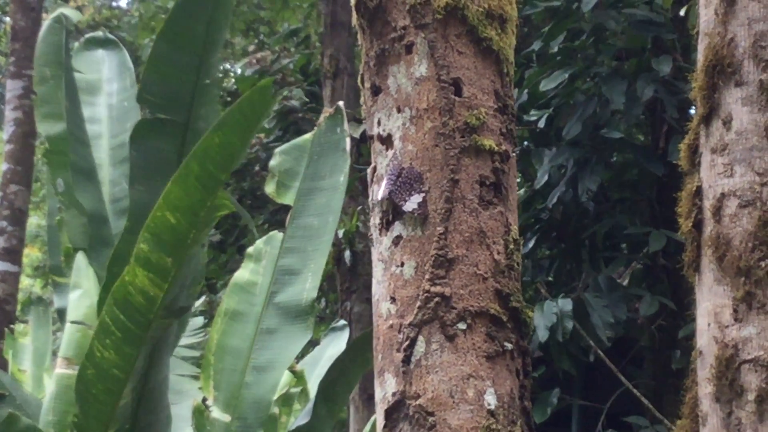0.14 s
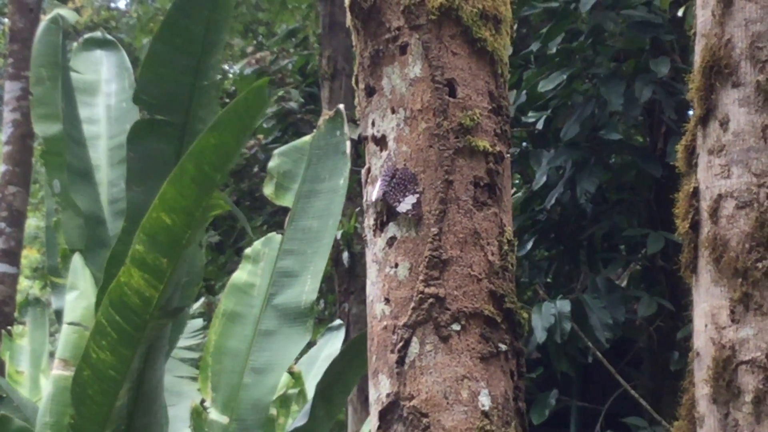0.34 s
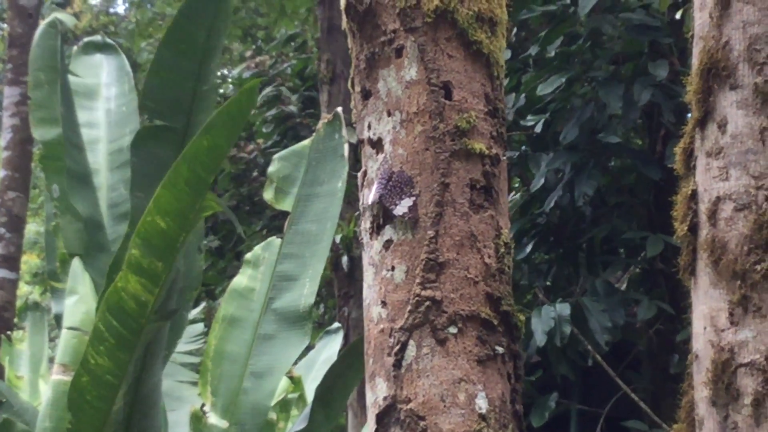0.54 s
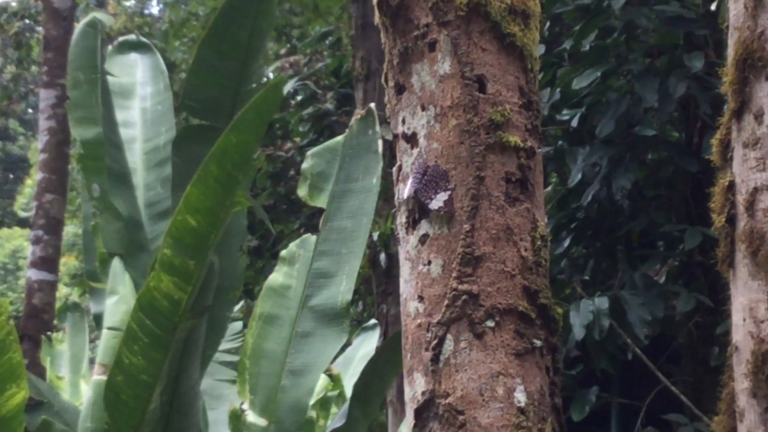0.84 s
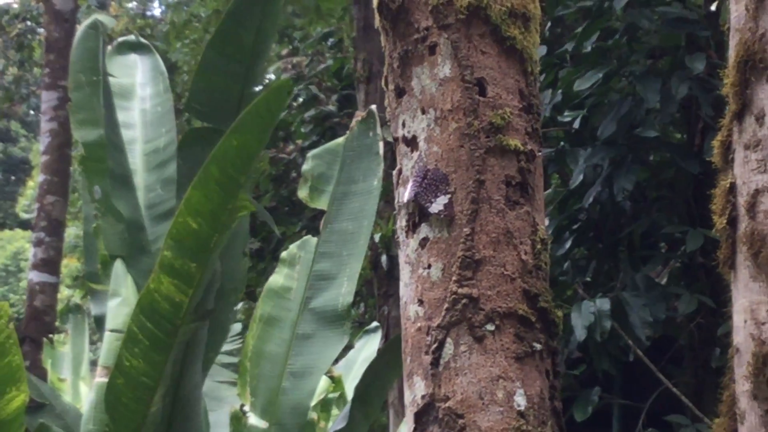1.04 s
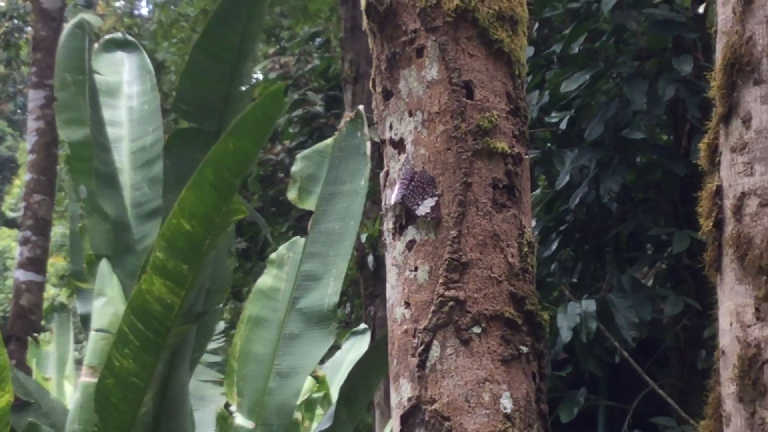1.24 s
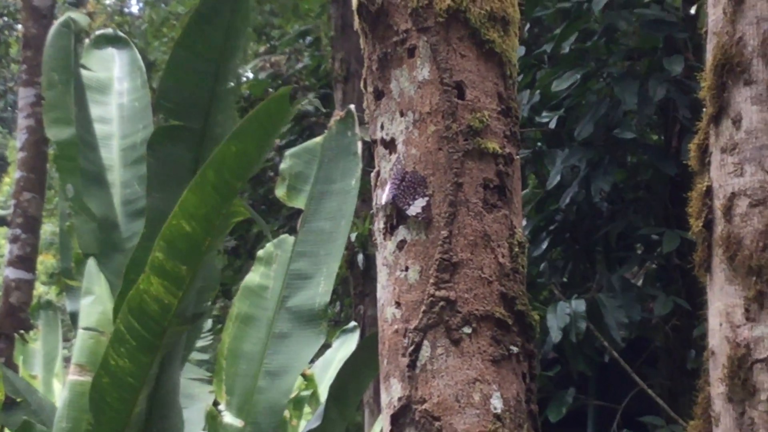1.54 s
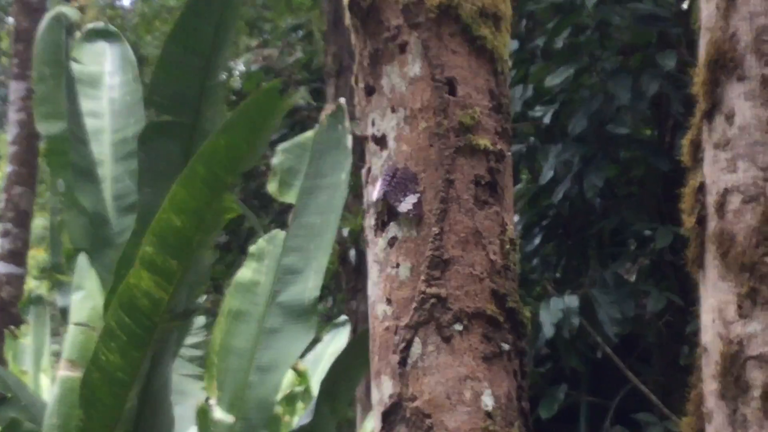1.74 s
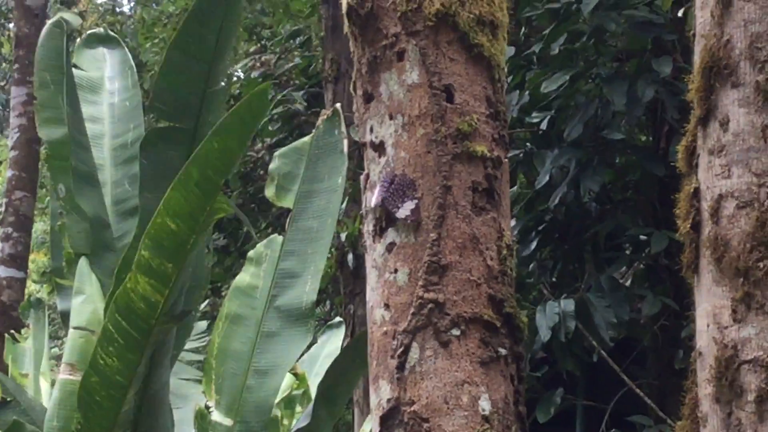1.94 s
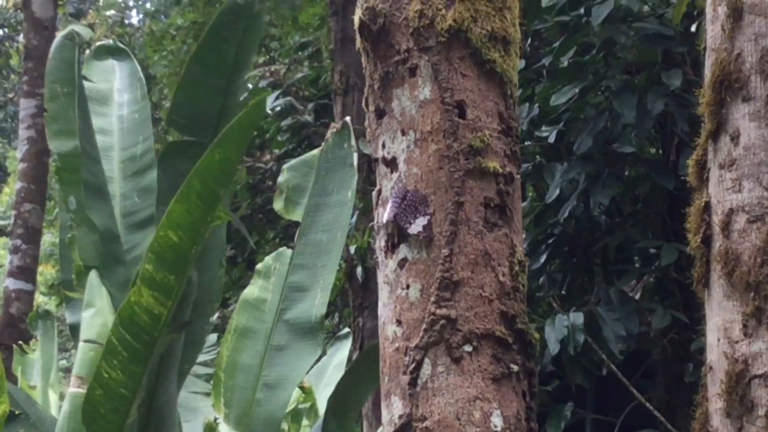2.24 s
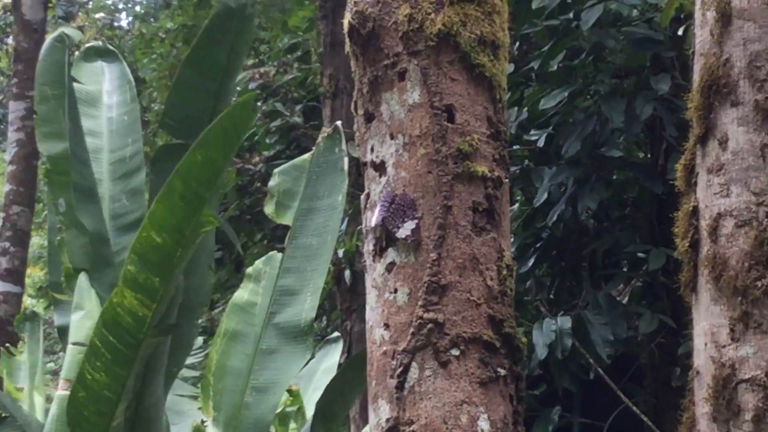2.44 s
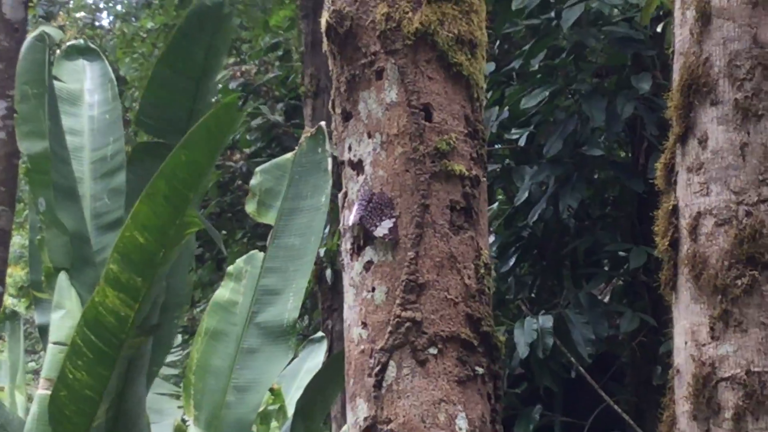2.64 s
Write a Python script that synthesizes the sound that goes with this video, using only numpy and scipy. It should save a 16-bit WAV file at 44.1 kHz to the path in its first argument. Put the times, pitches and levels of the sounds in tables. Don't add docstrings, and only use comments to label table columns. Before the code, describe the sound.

Cicadas buzz steadily in a bright, rapid-clicking high-pitched wall of sound over faint forest air

```python
import sys
import numpy as np
from scipy import signal
from scipy.fft import rfft, irfft
from scipy.io import wavfile

SR = 44100
rng = np.random.default_rng(int(sys.argv[2]) if len(sys.argv) > 2 else 0)


def unload_wav(signal):
    wavfile.write(
        sys.argv[1],
        SR,
        np.round(np.clip(np.atleast_2d(signal).T, -1, 1) * 32767).astype(np.int16),
    )


def gain_from_db(level_db):
    decades = np.asarray(level_db, float) / 20
    return 10 ** decades


N = 123921

# frequency in Hz, density in dB per Hz.
HUSH_SPECTRUM = [(13, -23), (22, -10), (71, -1.5), (130, -6), (345, -9.5), (489, -17.5), (1810, -22.5),
                 (2620, -23.5), (5800, -27.5), (7540, -27), (12800, -120)]
# time in seconds, leaf rustle in dB, low buffeting of the microphone in dB.
BREEZE_SWING = [(0, .5, 1), (.35, 0, -1), (.65, 0, 2.5), (.85, .5, 0), (1.05, -1, 2), (1.35, 0.7, 0),
                (1.7, .5, 1), (2.0, -0.4, 0), (2.4, -.7, .5), (2.8, -1, -2)]
# pitch in Hz, width in Hz, level in dB, throb rate per second.
FAR_CRICKETS = [
    (2612, 130, -90, 10),
    (6281, 50, -87, 5),
]
# time in seconds, peak in dB.
WIND_BUMPS = [(0.059, -58), (0.149, -61), (0.284, -58), (.615, -62), (.70, -54), (0.919, -58),
              (1.061, -62.5), (1.14, -63), (1.285, -61), (1.574, -63), (1.68, -55), (1.859, -62),
              (2.082, -60), (2.349, -57), (2.449, -62), (2.735, -60.5)]
# start in seconds, peak in dB, pitch of the lower mode in Hz.
TWIG_SNAPS = [
    (1.002, -64, 2150),
    (1.3, -69, 3600),
    (2.18, -68, 3200),
    (2.54, -68, 3300),
]
# frequency in Hz, density in dB per Hz.
CHORUS_SPECTRUM = [(3470, -84), (5900, -38), (6740, -19), (7980, -6), (9430, 2), (11600, -4), (12300, -7.5),
                   (13300, -19)]
# click pairs per second, gap inside the pair in ms.
NEAR_RHYTHMS = [(44.725, 7.254), (42.405, 8.06), (40.565, 9.2)]
# resonance in Hz, width in Hz, direct level in dB, echo level in dB,
# timing jitter in ms.
NEAR_BODIES = [(10860, 4100, -54, -56, .06), (6900, 2800, -57.5, -71, .15), (9870, 3700, -57.5, -56.5, .08)]
# time in seconds, lag in ms.
FIRST_LAG = [(0, 4.45), (.14, 4.4), (.42, 3.88), (.7, 3.8), (.98, 4.1), (1.24, 3.87), (1.42, 4.35),
             (1.54, 4.38), (1.68, 3.48), (1.88, 3.33), (2.38, 3.85), (2.52, 4.35), (2.8, 4.5)]
SECOND_LAG = [(0, 3.65), (.8, 3.5), (1.2, 4.45), (1.45, 3.75), (1.7, 4.2), (2.1, 4.0), (2.3, 3.5),
              (2.8, 3.72)]
THIRD_LAG = [(0, 3.2), (.84, 3.5), (1.26, 3.15), (1.6, 4.08), (2.1, 3.55), (2.26, 2.72), (2.38, 2.5),
             (2.52, 1.62), (2.8, .16)]
# time in seconds, first, second and third near singer in dB.
NEAR_EFFORT = [(0, 3.5, 1, -0.5), (.5, -0.5, -3, 4), (.8, 1.5, 0.5, -2.5), (1.2, 1.5, -1.5, -3),
               (1.7, -1, -1.5, 2), (2.0, 0, 0.5, 3.5), (2.4, -0.5, -2, 2.5), (2.8, 2, 3.5, -4)]

HUSH_DB, HUSH_FLICKER_DB = -68, 0.96
BUMP_HZ, BUMP_WIDTH_S, BUMP_TRIM_DB = 69, 0.0095, -1.5
SNAP_T60_S = 0.012
FOREST_T60_S, SCATTERERS_PER_S, LEAF_SWAY_PER_S = 0.56, 3000, 3
CLICK_SPREAD_DB, SECOND_CLICK_DB = 1.2, 0.2
CROWD_DB, CROWD_SPREAD_DB, CROWD_DIRECT_DB = -48.5, 2.5, -4
CROWD_SLOWEST_PER_S, CROWD_FASTEST_PER_S, CROWD_WANDER_MS = 38, 48, 0.6


def rms_one(x):
    return x / np.sqrt(np.mean(x ** 2) + 1e-20)


def drift(rate_hz, size=N):
    r = np.exp(-80 * np.pi * rate_hz / SR)
    noise = rng.standard_normal(size // 40 + 2002)
    slow = signal.lfilter([1], [1, -2 * r, r * r], noise)[2000:]
    return np.interp(np.arange(size) / 40, np.arange(len(slow)), rms_one(slow))


def at_hz(points, hz):
    table_hz, table_db = np.transpose(points)
    return np.interp(np.log(hz + 1), np.log(table_hz), table_db)


def filtered(x, gain_at):
    return irfft(rfft(x) * gain_at(np.fft.rfftfreq(len(x), 1 / SR)), len(x))


def resonance(x, hz, width_hz):
    r = np.exp(-np.pi * width_hz / SR)
    poles = [1, -2 * r * np.cos(2 * np.pi * hz / SR), r * r]
    return signal.lfilter([1 - r * r, 0, r * r - 1], poles, x) / 2


def hush():
    out = 0
    s, rustle_db, buffet_db = np.transpose(BREEZE_SWING)
    for centre_hz in 30 * 2 ** np.arange(10.):
        def band_gain(hz):
            octaves = np.clip(np.log2((hz + 1) / centre_hz), -1, 1)
            return gain_from_db(at_hz(HUSH_SPECTRUM, hz)) * np.cos(np.pi / 2 * octaves)

        swing_db = rustle_db if centre_hz > 400 else buffet_db
        breeze_db = np.interp(np.arange(N) / SR, s, swing_db - swing_db.mean())
        band = filtered(rng.standard_normal(N), band_gain)
        out = out + band * gain_from_db(HUSH_FLICKER_DB * drift(11.6) + breeze_db)
    return gain_from_db(HUSH_DB) * rms_one(out)


def far_crickets():
    out = 0
    for hz, width_hz, db, throb_per_s in FAR_CRICKETS:
        line = resonance(rng.standard_normal(N), hz, width_hz)
        line = resonance(line, hz, width_hz)
        out = out + gain_from_db(db + 2.6 * drift(throb_per_s)) * rms_one(line)
    return out


def wind_bumps():
    t, out = np.arange(N) / SR, 0
    for s, db in WIND_BUMPS:
        u = t - s
        hz = BUMP_HZ * (0.85 + 0.3 * rng.random())
        swell = gain_from_db(db + BUMP_TRIM_DB - 3.4 * (u / BUMP_WIDTH_S) ** 2)
        out = out + swell * np.sin(2 * np.pi * hz * u + rng.random())
    return out


def twig_snaps():
    out = 0
    for s, db, hz in TWIG_SNAPS:
        t = np.maximum(np.arange(N) / SR - s, 0)
        modes = np.sin(2 * np.pi * hz * t) + np.sin(2 * np.pi * 1.51 * hz * t)
        out = out + gain_from_db(db - 60 * t / SNAP_T60_S) * modes
    return out


def click_pairs(pairs_per_s, gap_ms, lag_ms, jitter_ms):
    start_s = np.arange(-50, 150) / pairs_per_s
    chance = rng.standard_normal((len(start_s), 3))
    late_ms = lag_ms(start_s) + jitter_ms * chance[:, 0]
    first = np.round((1 + start_s + late_ms / 1000) * SR).astype(int)
    keep = first >= 0
    second = first[keep] + int(round(gap_ms * SR / 1000))
    train = np.zeros(6 * SR)
    train[first[keep]] = gain_from_db(CLICK_SPREAD_DB * chance[keep, 1])
    train[second] = gain_from_db(SECOND_CLICK_DB + CLICK_SPREAD_DB * chance[keep, 2])
    return train[:N + SR]


def scattered(x, count=3):
    t, out = np.arange(SR // 2) / SR, 0
    for _ in range(count):
        turn = 2 * np.pi * rng.random() + 2 * drift(LEAF_SWAY_PER_S, size=len(x))
        for share in np.cos(turn), np.sin(turn):
            hit = rng.random(len(t)) < SCATTERERS_PER_S / SR
            echoes = rng.standard_normal(len(t)) * hit * gain_from_db(-60 * t / FOREST_T60_S)
            out = out + signal.fftconvolve(x * share, rms_one(echoes))[:len(x)]
    return out


def tymbal_colour(x):
    points = [(4500, -63)] + list(CHORUS_SPECTRUM) + [(14000, -40)]
    return rms_one(filtered(x, lambda hz: gain_from_db(at_hz(points, hz)))[SR:])


def far_crowd(count):
    song = 0
    for rate, gap, phase, size in rng.random((count, 4)):
        wander_ms = CROWD_WANDER_MS * drift(1.5)
        pairs_per_s = CROWD_SLOWEST_PER_S + (CROWD_FASTEST_PER_S - CROWD_SLOWEST_PER_S) * rate

        def lag_ms(s):
            return 25 * phase + np.interp(s * SR, np.arange(N), wander_ms)

        clicks = click_pairs(pairs_per_s, 7 + 2.5 * gap, lag_ms, jitter_ms=0.1)
        song = song + gain_from_db(2 * CROWD_SPREAD_DB * size) * clicks
    direct = gain_from_db(CROWD_DIRECT_DB) * tymbal_colour(song)
    return gain_from_db(CROWD_DB) * (direct + tymbal_colour(scattered(song)))


def near_cicadas():
    out, t = 0, np.arange(N + SR) / SR - 1
    effort_s, *efforts_db = np.transpose(NEAR_EFFORT)
    lags = FIRST_LAG, SECOND_LAG, THIRD_LAG
    for rhythm, body, lag, effort_db in zip(NEAR_RHYTHMS, NEAR_BODIES, lags, efforts_db):
        pairs_per_s, gap_ms = rhythm
        hz, width_hz, direct_db, echo_db, jitter_ms = body
        lag_s, lag_ms = np.transpose(lag)
        clicks = click_pairs(pairs_per_s, gap_ms, lambda s: np.interp(s, lag_s, lag_ms), jitter_ms)
        song = resonance(clicks, hz, width_hz) * gain_from_db(np.interp(t, effort_s, effort_db))
        out = out + gain_from_db(direct_db) * tymbal_colour(song)
        out = out + gain_from_db(echo_db) * tymbal_colour(scattered(song))
    return out


def scene():
    background = hush() + far_crickets() + wind_bumps() + twig_snaps()
    return (background + far_crowd(count=24) + near_cicadas())[None]


def top_cut(x):
    return signal.sosfilt(signal.butter(12, 13560, fs=SR, output="sos"), x)


def record(dry):
    return top_cut(dry)


dry = scene()
out = record(dry)
unload_wav(out)
```